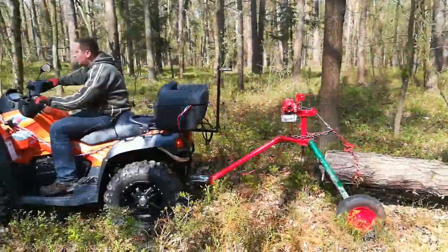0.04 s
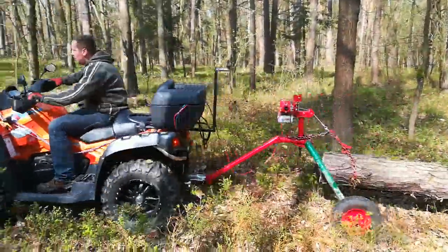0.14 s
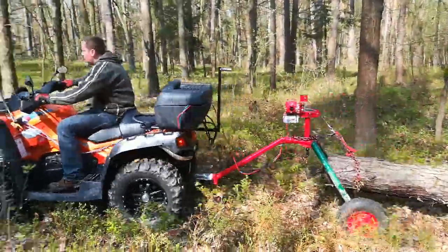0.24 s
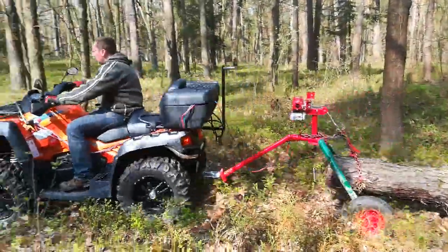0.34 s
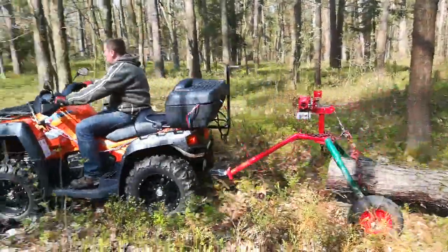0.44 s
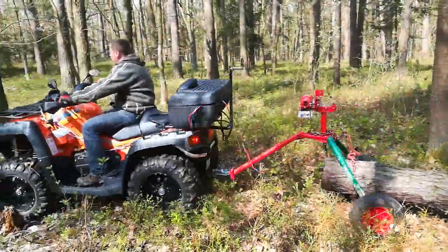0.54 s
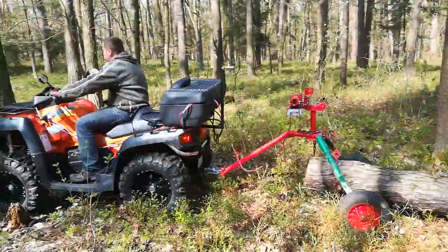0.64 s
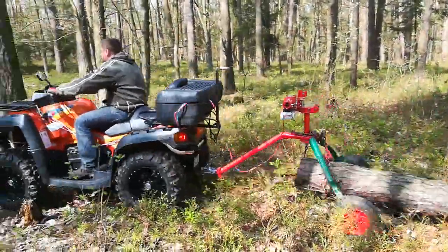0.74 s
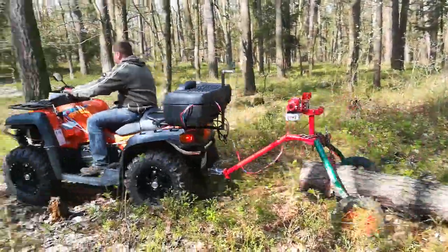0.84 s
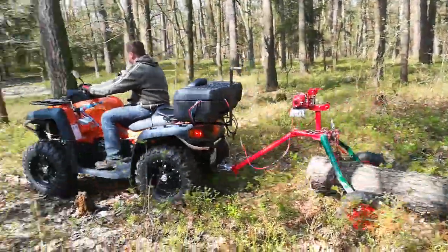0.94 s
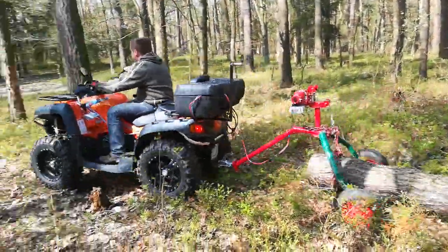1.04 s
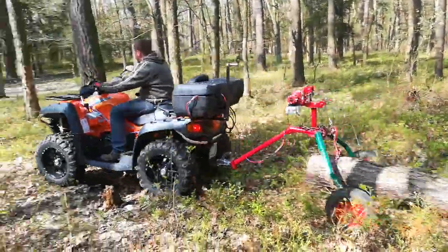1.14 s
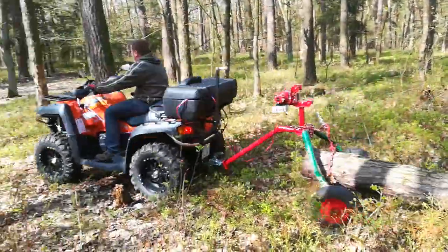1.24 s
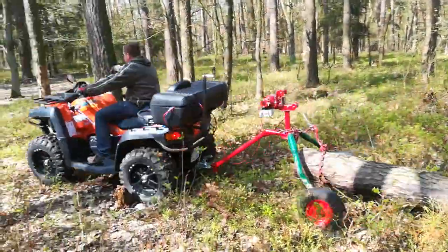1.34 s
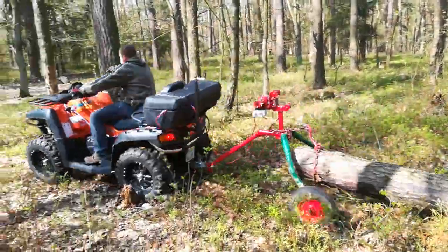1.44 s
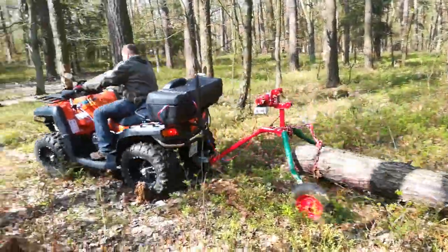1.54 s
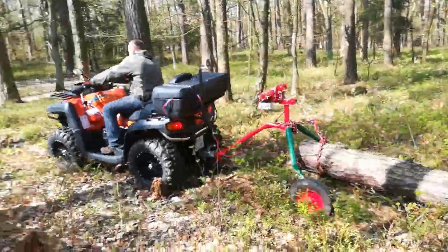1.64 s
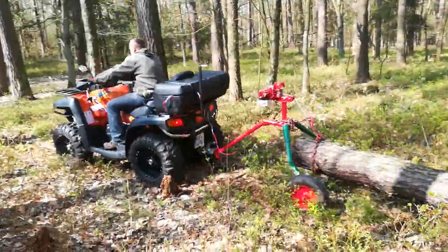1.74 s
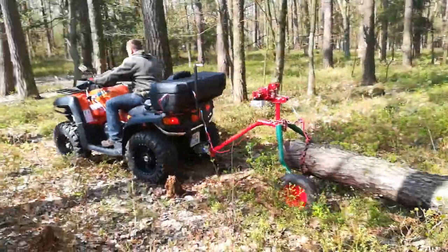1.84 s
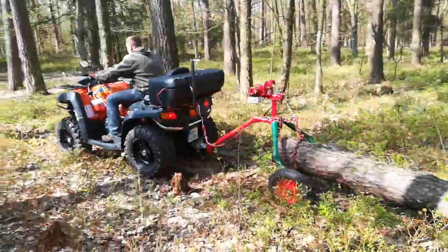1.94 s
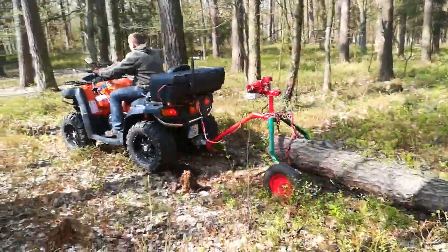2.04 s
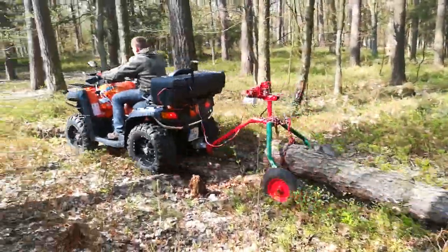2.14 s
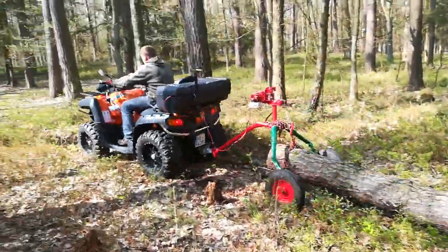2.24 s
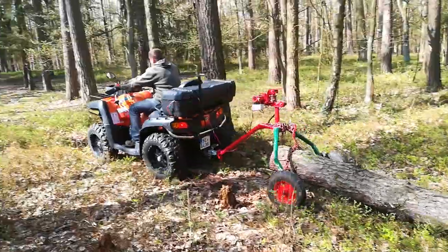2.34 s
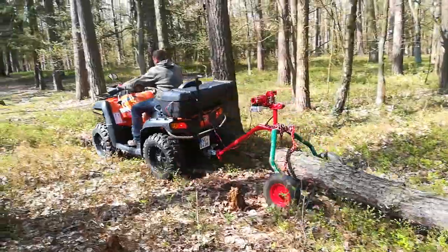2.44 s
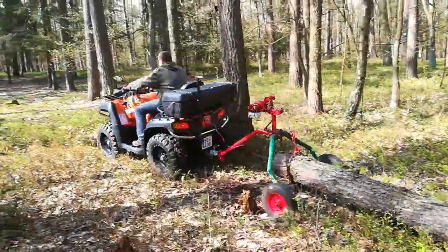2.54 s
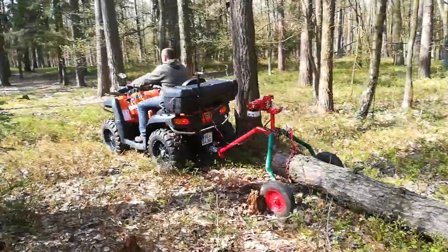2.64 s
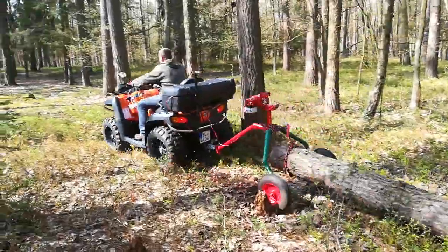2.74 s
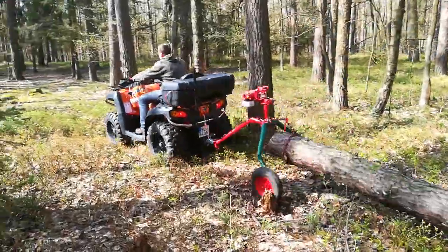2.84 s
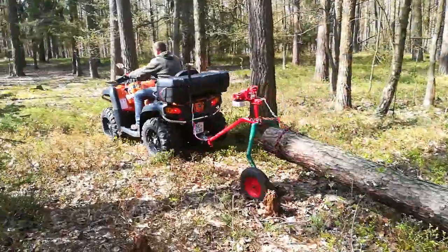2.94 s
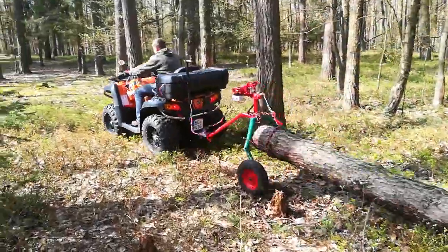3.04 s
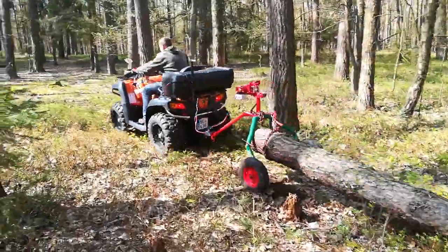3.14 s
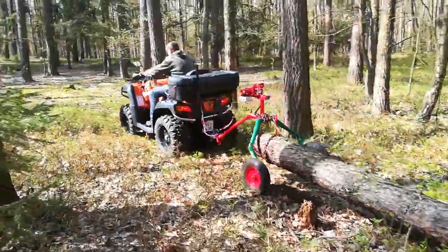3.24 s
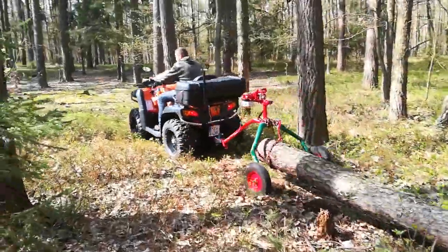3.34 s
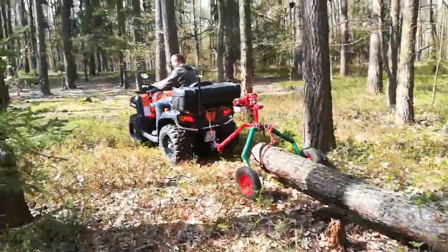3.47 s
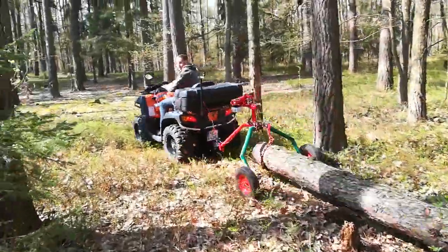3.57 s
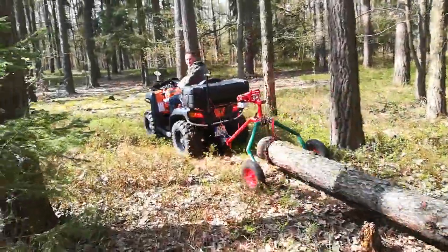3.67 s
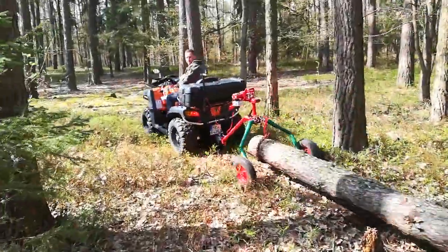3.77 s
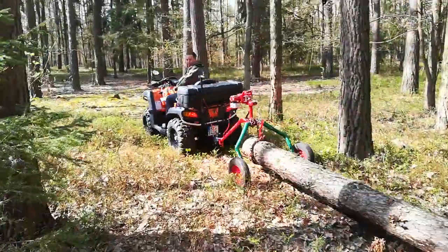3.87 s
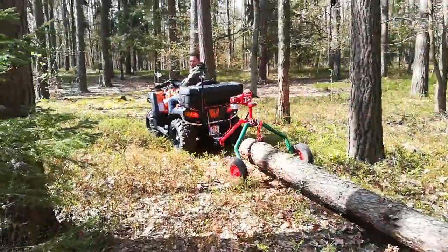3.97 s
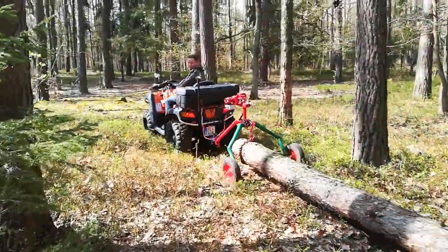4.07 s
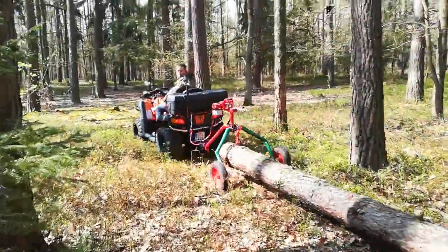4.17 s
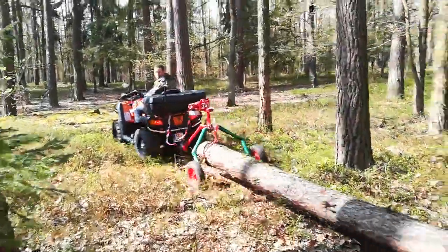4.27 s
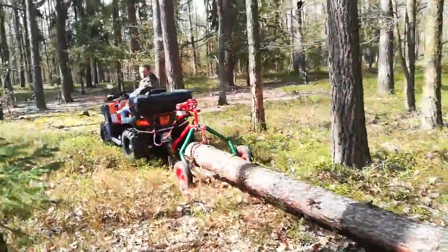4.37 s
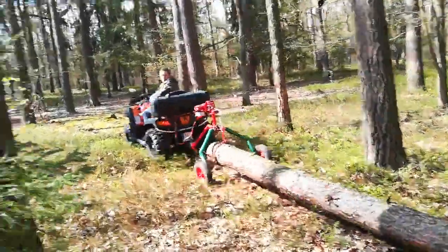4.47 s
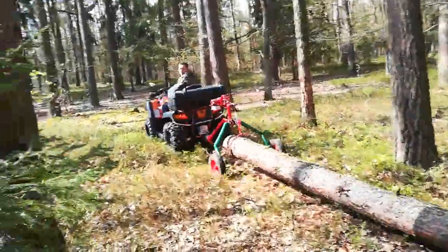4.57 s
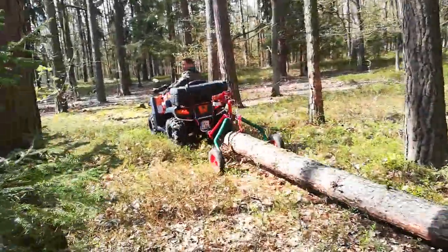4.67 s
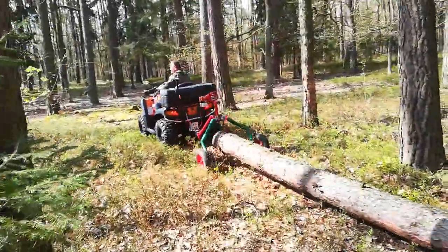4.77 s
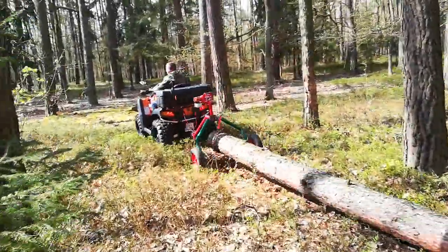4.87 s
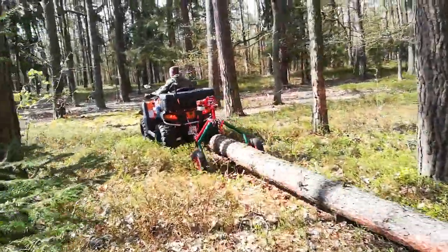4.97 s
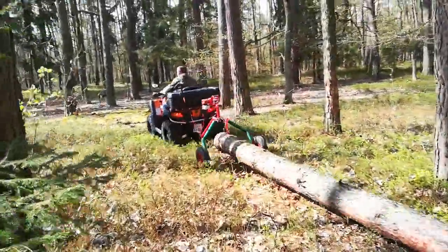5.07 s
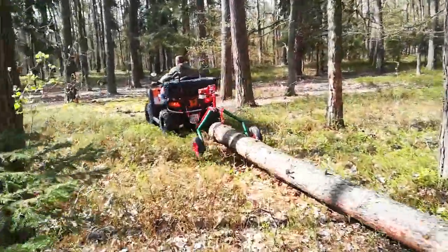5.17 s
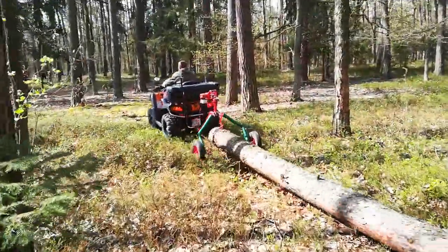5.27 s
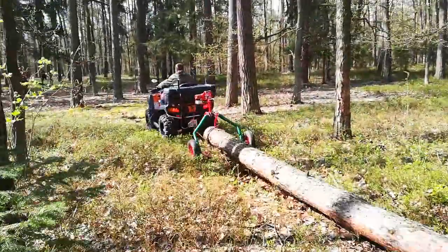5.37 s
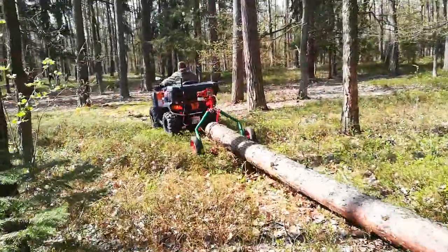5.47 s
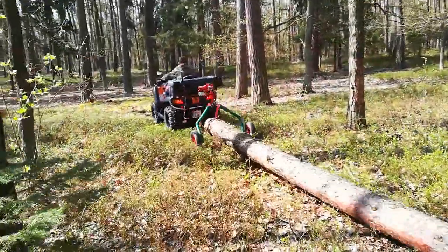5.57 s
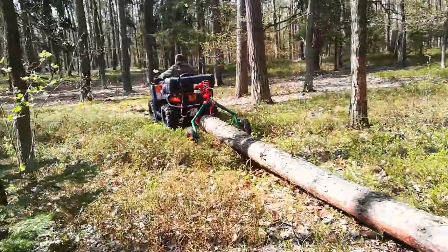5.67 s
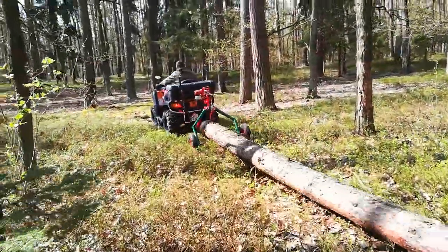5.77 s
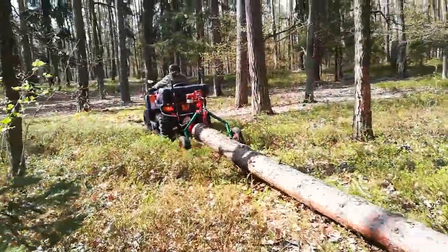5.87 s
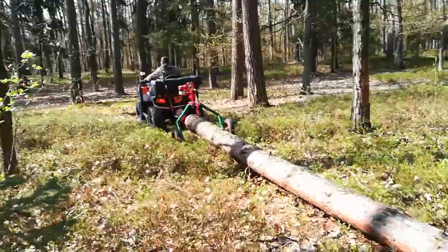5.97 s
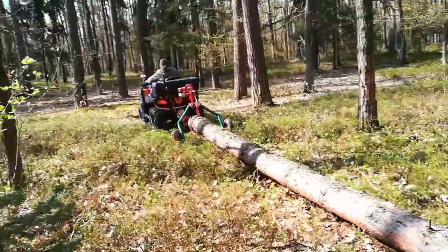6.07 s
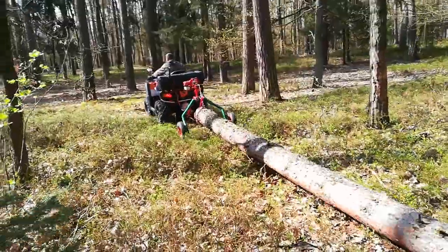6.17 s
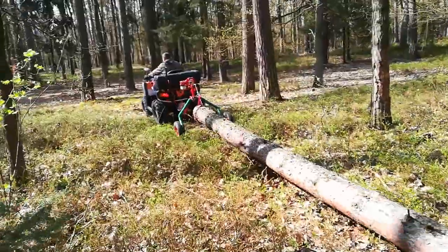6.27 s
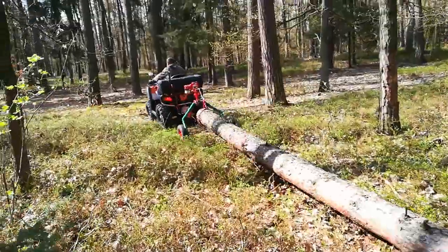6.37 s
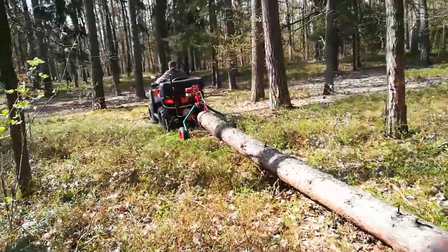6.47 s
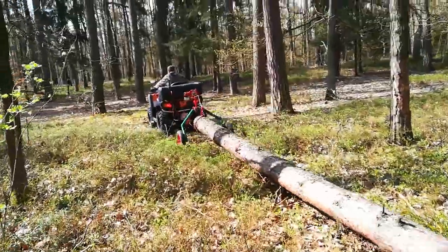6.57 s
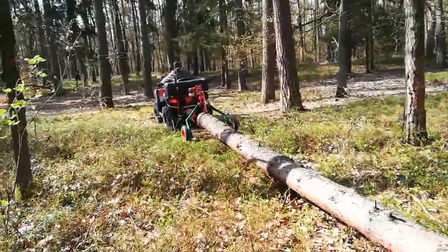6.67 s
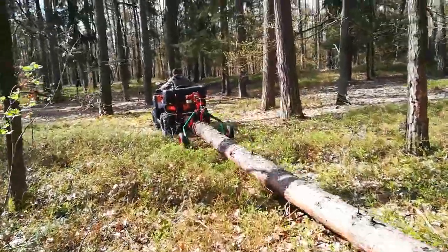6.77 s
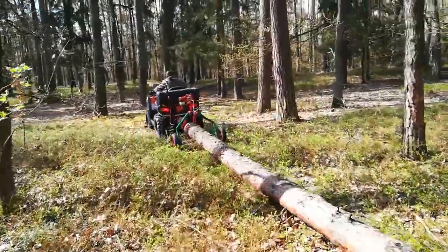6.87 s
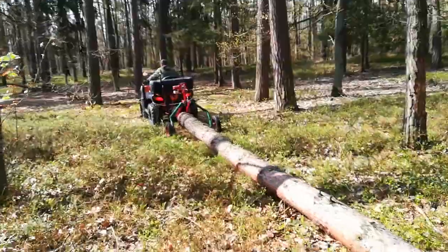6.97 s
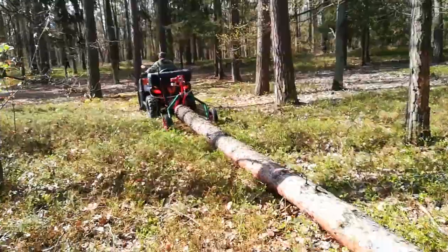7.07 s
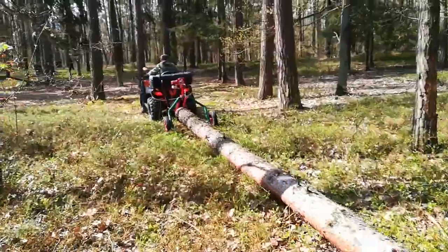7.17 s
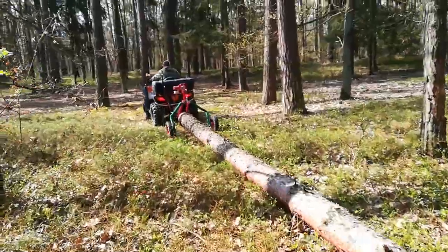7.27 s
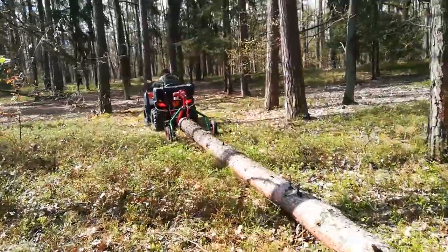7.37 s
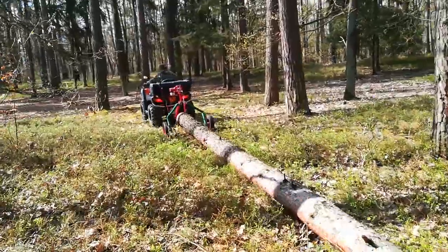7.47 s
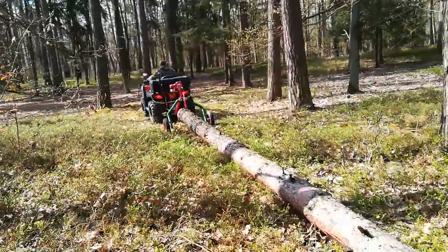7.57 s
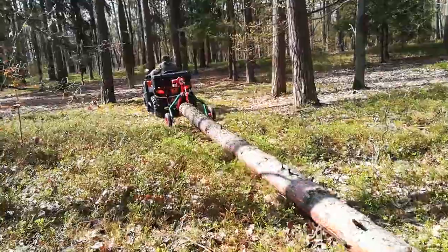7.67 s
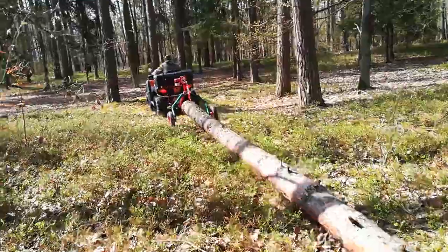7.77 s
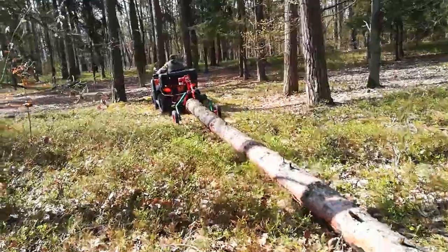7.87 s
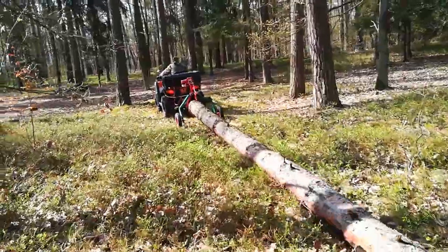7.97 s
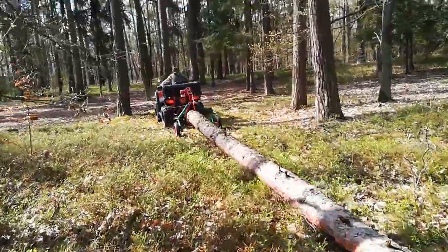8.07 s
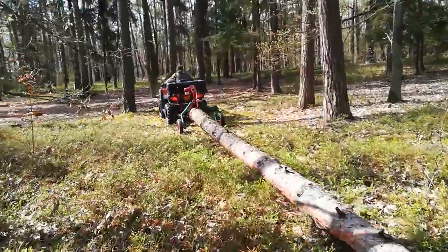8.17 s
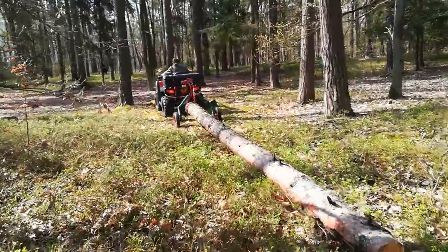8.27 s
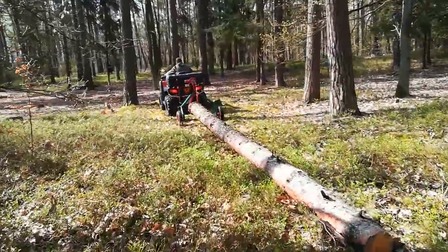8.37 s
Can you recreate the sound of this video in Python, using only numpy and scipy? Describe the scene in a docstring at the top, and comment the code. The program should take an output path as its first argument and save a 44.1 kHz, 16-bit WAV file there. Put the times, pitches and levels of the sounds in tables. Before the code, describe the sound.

A quad bike towing a log starts close to the microphone, its low exhaust thumping with a brief hollow bodywork boom and raspy clatter. Dry leaves and needles crackle, twigs snap sharply. The engine dips, revs up, then settles as it draws away, with thin gear whine coming and going. Outdoors in woodland, with faint echoes from trunks; stereo, engine central, litter wide.

```python
"""Thumping exhaust and a short bodywork boom come first, with litter crackling and twigs snapping:
a twin-cylinder quad bike tows a log through a pine forest and draws away from a two-port microphone.
Exhaust: twelve sine orders locked to engine speed; casing, rasp and boom: noise and clicks in bands.
Gears: gliding sines. Tyres and log: dull noise, grainy litter hiss, snap and crunch bursts."""
import sys
import numpy as np
from scipy import signal
from scipy.fft import rfft, irfft
from scipy.io import wavfile
from scipy.ndimage import uniform_filter1d

SR = 44100
rng = np.random.default_rng(int(sys.argv[2]) if len(sys.argv) > 2 else 0)


def log_audio(samples):
    """Write samples as a 16-bit WAV file to the path given in sys.argv[1]."""
    # one column per channel
    frames = np.atleast_2d(samples).T
    # limit to full scale, then quantise
    limited = np.clip(frames, -1, 1)
    pcm = np.round(limited * 32767).astype(np.int16)
    wavfile.write(sys.argv[1], SR, pcm)


N = 370881


def from_db(db):
    """Gain of a dB value."""
    return 10 ** (np.asarray(db) / 20)


def rms_one(x):
    """Scaled to rms 1."""
    return x / np.sqrt(np.mean(x ** 2) + 1e-20)


def evened(x):
    """Level held near rms 1 by two 0.2 s averages of power in a row."""
    power = uniform_filter1d(uniform_filter1d(x ** 2, SR // 5), SR // 5)
    return x / np.sqrt(power + 1e-12)


def in_time(rows):
    """Columns of a curve table, sample by sample."""
    time_s, *columns = np.transpose(rows)
    return [np.interp(np.arange(N) / SR, time_s, column) for column in columns]


def at_hz(points, hz):
    """A spectrum read on a log-frequency axis."""
    point_hz, value = np.array(points).T
    return np.interp(np.log(hz + 1), np.log(point_hz), value)


def colour(x, spectrum):
    """Causal (minimum-phase) filter with the given dB spectrum."""
    size = 16384
    gain = from_db(at_hz(spectrum, np.fft.rfftfreq(size, 1 / SR)))
    cepstrum = irfft(np.log(gain))
    cepstrum[1:size // 2] *= 2
    cepstrum[size // 2 + 1:] = 0
    response = irfft(np.exp(rfft(cepstrum)))
    return signal.fftconvolve(x, np.atleast_2d(response), axes=-1)[:, :N]


def band(x, low_hz, high_hz):
    """Second-order Butterworth band-pass."""
    return signal.sosfilt(signal.butter(2, [low_hz, high_hz], "band", fs=SR, output="sos"), x)


def burst(envelope, hz, octaves):
    """Stereo noise under an envelope, then limited to hz plus or minus octaves."""
    low_hz, high_hz = np.clip([hz / 2 ** octaves, hz * 2 ** octaves], 100, .45 * SR)
    return band(envelope * rng.standard_normal((2, len(envelope))), low_hz, high_hz)


def drift(rate_hz):
    """Slow random curve of rms 1, computed every 40 samples."""
    r = np.exp(-80 * np.pi * rate_hz / SR)
    slow = signal.lfilter([1], [1, -2 * r, r * r], rng.standard_normal(N // 40 + 2002))[2000:]
    return np.interp(np.arange(N) / 40, np.arange(len(slow)), rms_one(slow))


# stereo likeness of wide noise: hz, left_right_correlation
LIKENESS = [(300, 0.077), (640, 0.19), (1400, 0.69), (3100, 0.068), (15000, 0.039)]
# stereo balance of wide noise: hz, left_minus_right_db
BALANCE = [(300, -5), (700, 15.5), (1400, -6), (2800, 1), (5600, 3), (12000, 1.1)]


def spread(white, low_hz, count, patchy_db):
    """Four white signals become stereo, in half-octave bands with own likeness, balance and flicker."""
    out, edges_hz = 0, low_hz * 2 ** (np.arange(count + 1) / 2)
    for k, (low, high) in enumerate(zip(edges_hz, edges_hz[1:])):
        mid, side = band(white[k % 2], low, high)
        hz = np.sqrt(low * high)
        alike = np.clip(at_hz(LIKENESS, hz), -1, 1)
        balance_db = at_hz(BALANCE, hz) * np.array([[.5], [-.5]])
        gain = from_db(patchy_db * drift(24) + balance_db)
        out = out + gain * (np.sqrt(1 + alike) * mid + np.sqrt(1 - alike) * side * [[1], [-1]])
    return out


NEAREST_M, NEAREST_S, GROUND_M_PER_S = 3.74, 0.032, 1.197
TURN_FROM_S, TURN_TO_S = 1.64, 4.04


def passing():
    """Straight path: loss in dB by inverse distance, and the turn from 0 side-on to 1 from behind."""
    t = np.arange(N) / SR
    metres = np.hypot(NEAREST_M, GROUND_M_PER_S * (t - NEAREST_S))
    turn = np.clip((t - TURN_FROM_S) / (TURN_TO_S - TURN_FROM_S), 0, 1)
    return 20 * np.log10(NEAREST_M / metres), np.sin(turn * np.pi / 2)


# returns from trunks and ground, per port: delay_s, level_db
ECHOES_LEFT = [(.021, -60), (.047, -20)]
ECHOES_RIGHT = [(.030, -24), (.061, -24)]


def forest(x):
    """Direct sound plus trunk and ground echoes: delayed copies, different at each port."""
    ports = []
    for echoes in (ECHOES_LEFT, ECHOES_RIGHT):
        port = x
        for delay_s, db in echoes:
            port = port + from_db(db) * np.r_[np.zeros(round(delay_s * SR)), x][:N]
        ports.append(port)
    return np.stack(ports)


RUMBLE_DB, RUMBLE_TOP_HZ = -43, 143   # level before distance loss
RUMBLE_FOLLOWS = 0.38   # share of the engine's dB loss with distance


def rumble(loss_db):
    """Tyres and log on the ground: low-passed noise, partly its own in each port."""
    white = rng.standard_normal((2, N)) * 0.9 + rng.standard_normal(N)
    dull = signal.sosfilt(signal.butter(2, RUMBLE_TOP_HZ, fs=SR, output="sos"), white)
    return from_db(RUMBLE_DB + RUMBLE_FOLLOWS * loss_db) * rms_one(dull)


# dry litter under wheels and log: time_s, level_db
RUSTLE = [(0.0, -36.5), (0.84, -37), (1.87, -38.5), (2.25, -36.5), (2.69, -39), (2.97, -39.5), (3.35, -36),
          (4.54, -43), (5.04, -41.5), (5.43, -47), (6.09, -45), (6.7, -47.5), (7.0, -41), (7.61, -42.5),
          (8.06, -40.5), (8.41, -44)]
# litter colour: hz, relative_db
LITTER = [(1180, -20), (2000, -6), (2560, -7.5), (3460, -6), (4210, -3), (4960, -1.5), (6930, 0),
          (9270, -5), (10300, -10.5), (11400, -9), (12500, -12.5), (14900, -13.5), (15500, -4),
          (15900, -48)]
GRAINS_PER_S, GRAIN_SPREAD_DB, GRAIN_DB = 1500, 4.5, -8.5   # GRAIN_DB: relative to the hiss


def rustle():
    """Leaves and needles: dense random clicks of uneven size on a bed of hiss."""
    sizes = from_db(GRAIN_SPREAD_DB * np.minimum(rng.exponential(1, (2, 2, N)), 5))
    struck = rng.random(N) < GRAINS_PER_S * from_db(3 * drift(12)) / SR
    grains = sizes * rng.standard_normal((2, 2, N)) * struck
    white = rng.standard_normal((2, 2, N)) + from_db(GRAIN_DB) * rms_one(grains)
    bed = spread(white, low_hz=1420, count=7, patchy_db=1.5)
    return from_db(in_time(RUSTLE)[0]) * rms_one(colour(bed, LITTER))


PORT_LAG = 4   # samples by which record() delays the right port


# twig snaps: start_s, crack_peak_db, pitch_hz, left_minus_right_db, wide_noise_db, tail_db
# (wide noise relative to the crack's tone, tail relative to the crack)
SNAPS = [(0.3425, -21, 6130, 6, 2, -12), (0.5215, -19, 4530, 8, 1, -15), (1.2193, -36, 6650, 3, -12, -14),
         (1.267, -25.5, 6900, 6, -16, -14), (1.385, -23.5, 6450, 2, -12, -5),
         (1.502, -29, 5900, 3, -12, -14), (1.765, -30, 6300, 3, -12, -14), (1.798, -31, 6350, 3, -12, -14),
         (2.646, -30, 7100, 7, -14, -12), (2.9858, -25.5, 4900, 5, -12, -4), (3.4020, -18, 6500, 9, 5, -10),
         (4.3258, -28, 6830, 2.5, -12, -8), (4.692, -25.5, 6300, 6, -17, -14),
         (4.8364, -32, 3880, 3, -10, -14), (4.868, -28, 4000, 3, -14, -16), (4.873, -25, 4950, 5, 4, -7),
         (4.8845, -32, 4730, 3, -12, -14), (4.987, -30, 3500, 3, -4, -16), (5.142, -21, 6300, -8, -6, -16),
         (5.1688, -26, 6680, 1, -1, -16), (5.384, -25, 6760, 0, -1, -10), (5.7346, -26, 2550, -2, 3, -12),
         (5.7918, -36, 3590, 1, -12, -14), (6.2858, -34, 2700, -3, -12, -14),
         (6.4832, -20.5, 6400, 7, -6, -7.5), (6.745, -35, 7110, 5, -12, -14),
         (6.889, -29, 5660, 6, -14, -8), (7.1335, -33, 7400, 3, -8, -12), (8.084, -29, 6260, 4, -12, -14),
         (8.2842, -18.5, 5900, 4, -1, -22)]


def snap(db, hz, pan_db, wide_db, tail_db):
    """Breaking wood: a fast-decaying tone and wide noise, then a grainy splinter tail from 2 ms."""
    t = np.arange(2000) / SR
    tone = rms_one(t * np.exp(-t / .0003) * np.sin(2 * np.pi * hz * t))
    wide = rms_one(burst(np.exp(-t / .0004), 5000, octaves=1.4)[0])
    crack = tone + from_db(wide_db) * wide
    splinters = from_db(3 * rng.standard_normal(50)).repeat(40) * (t > .002)
    tail = burst(from_db(tail_db) * splinters * np.exp(-t / .0055), hz, octaves=1)
    both = crack / np.abs(crack).max() + tail
    return from_db(db) * both * from_db([[pan_db / 2], [-pan_db / 2]])


# short crunches of bark or brush: start_s, length_s, centre_hz, level_db, half_width_octaves
CRUNCHES = [(2.143, 0.17, 7170, -39, 0.46), (2.663, .07, 12500, -46, .3), (2.982, 0.066, 4270, -43.5, 0.48),
            (3.0, 0.5, 12500, -52, .3), (4.834, 0.031, 4370, -38, 0.42), (4.875, 0.026, 5170, -37.5, .5),
            (4.895, 0.05, 4300, -48, 0.07), (4.84, 0.089, 12500, -54, .3), (4.975, 0.014, 7100, -42, .1),
            (8.077, 0.07, 6300, -45, 0.51)]


def crunch(length_s, hz, db, octaves):
    """Crushed bark or brush: a rough noise burst with five narrow splinter rings inside its band."""
    size = round(length_s * SR)
    grain = from_db(3 * rng.standard_normal(size // 60 + 1)).repeat(60)[:size]
    envelope = grain * np.interp(np.arange(size), [0, .2 * size, size], [0, 1, .2])
    steps = rng.uniform(-1, 1, 5)
    rings = sum(burst(envelope, hz * 2 ** (octaves * step), octaves=.03) for step in steps)
    rough = rms_one(burst(envelope, hz, octaves))
    return from_db(db) * rms_one(rough + 0.39 * rms_one(rings))


def twigs():
    """Snaps and crunches placed in time; broadside, so they reach both ports together."""
    out = np.zeros((2, N + SR))
    hits = [(start_s, snap(*row)) for start_s, *row in SNAPS]
    hits += [(start_s, crunch(*row)) for start_s, *row in CRUNCHES]
    for start_s, hit in hits:
        at = round(start_s * SR)
        out[:, at:at + hit.shape[1]] += hit
    return np.stack([out[0, :N], out[1, PORT_LAG:N + PORT_LAG]])   # cancels the lag in record()


# gear whines: start_s, end_s, start_hz, middle_hz, end_hz, level_db (pitch and level before waver)
WHINES = [(.1, .5, 2455, 2400, 2345, -57), (.86, 1.0, 2365, 2390, 2420, -60), (0, .22, 980, 975, 965, -54),
          (.05, .95, 1600, 1550, 1515, -58), (.52, .75, 1240, 1215, 1170, -52),
          (1.52, 1.95, 1225, 1150, 1100, -49), (1.6, 1.92, 930, 900, 870, -51),
          (2.1, 2.35, 1480, 1510, 1545, -60), (2.2, 2.6, 1245, 1305, 1345, -55),
          (2.68, 3.2, 1345, 1350, 1345, -58), (3.4, 3.62, 1370, 1400, 1440, -57),
          (3.62, 4.1, 1195, 1210, 1228, -53.5), (4.19, 4.8, 1285, 1302, 1308, -50),
          (4.8, 5.17, 1308, 1280, 1258, -53), (4.8, 5.15, 1270, 1230, 1190, -59),
          (5.3, 5.7, 1390, 1375, 1355, -59), (5.65, 6.1, 1405, 1420, 1418, -59),
          (6.55, 7.2, 1510, 1530, 1545, -62), (7.45, 8.1, 1245, 1235, 1250, -61)]


def whine():
    """Gears: sine tones that glide and waver in pitch and level, with 16 ms fades."""
    out, t = np.zeros(N), np.arange(N) / SR
    waver_db = 1.3 * drift(60) + 1.8 * drift(5)
    waver_hz = 3 * drift(30) + 2.5 * drift(4)
    for start_s, end_s, *glide_hz, db in WHINES:
        on = slice(round(start_s * SR), round(end_s * SR))
        fade = np.clip(np.minimum(t[on] - start_s, end_s - t[on]) / 0.016, 0, 1)
        hz = np.interp(t[on], [start_s, (start_s + end_s) / 2, end_s], glide_hz) + waver_hz[on]
        tone = np.sqrt(2) * np.sin(2 * np.pi * np.cumsum(hz) / SR)
        out[on] += fade * from_db(db + waver_db[on]) * tone
    return out


# body resonances: centre_hz, width_hz, side_db, rear_db, db_per_cycle_per_s
BODY = [(566, 24, -70, -65.5, 2.4), (620, 60, -64, -53, -1.5), (705, 30, -70, -65, 1.5),
        (790, 40, -70, -63, -1.5), (870, 50, -60, -66, .5), (920, 300, -51, -72, 0),
        (780, 400, -59, -58, .5), (485, 70, -72, -67, 2.2), (1120, 160, -58, -61, 0)]


def singing(once, away, faster):
    """Body resonances rung by one click a cycle: engine orders inside them sing, coming and going."""
    out = 0
    for hz, width_hz, side_db, rear_db, db_per_cycle_per_s in BODY:
        r = np.exp(-np.pi * width_hz / SR)
        peak = [(1 - r * r) / 2, 0, (r * r - 1) / 2, 1, -2 * r * np.cos(2 * np.pi * hz / SR), r * r]
        db = side_db + (rear_db - side_db) * away + db_per_cycle_per_s * faster + 2.2 * drift(4)
        out = out + from_db(db) * rms_one(signal.sosfilt([peak, peak], once))
    return out


FIRING_SPREAD_DB, FIRING_JITTER_S = 0.5, .00006


def firings(cycle):
    """Two firings a cycle: clicks uneven in strength and time; also a copy with alternating sign."""
    at = np.flatnonzero(np.diff(np.floor(2 * cycle)))
    chance = rng.standard_normal((len(at), 2))
    at = np.clip(at + np.round(FIRING_JITTER_S * SR * chance[:, 0]).astype(int), 0, N - 1)
    both, unlike = np.zeros((2, 1, N))
    both[0, at] = from_db(FIRING_SPREAD_DB * chance[:, 1])
    unlike[0, at] = both[0, at] * (-1) ** np.round(2 * cycle[at])
    return both, unlike


# clatter colour from the side and from behind: hz, relative_db
CLATTER_SIDE = [(220, 7), (380, 0), (449, -8), (599, 0), (657, -4.5), (927, 2.5), (1190, 2.5), (1360, 0),
                (1560, 3), (1730, -2), (2410, -4.5), (2750, -11), (3500, 1), (4550, -35), (7700, -120)]
CLATTER_REAR = [(220, -12), (380, -5.5), (453, -12), (521, -6.5), (567, 1.5), (664, -5), (814, -3.5),
                (953, -7), (1260, 5.5), (1430, 2.5), (1620, -2), (1830, 4), (1990, -6), (2440, -9.5),
                (3500, -0.5), (4550, -22), (7700, -120)]
# knock relative to the casing noise: time_s, relative_db
KNOCK = [(0, -5), (1.6, -5), (1.9, -3), (2.4, -3), (4.8, -4), (5.3, -8), (8.41, -8)]
CLATTER_DB, GATE_DEPTH = -39.5, 0.022   # level before distance loss
KNOCK_TOP_HZ, KNOCK_RING_S, KNOCK_SPREAD_DB = 1050, .006, 1.2


def clatter(cycle, both, unlike, away, loss_db):
    """Casing noise swelling slightly twice a cycle, plus a decaying knock ring for each cylinder."""
    gate = 1 + GATE_DEPTH * np.cos(2 * np.pi * 2 * cycle - 1.5)
    white = rng.standard_normal((2, 2, N))
    noise = rms_one(spread(white, low_hz=279.2, count=8, patchy_db=2)) * gate
    rings = rng.standard_normal((2, 1, 2000)) * np.exp(-np.arange(2000) / SR / KNOCK_RING_S)
    uneven = from_db(KNOCK_SPREAD_DB * rng.standard_normal(N))
    knock = 0
    for sign, ring in zip((1, -1), rings):
        knock = knock + signal.fftconvolve(uneven * (both + sign * unlike), ring)[:, :N]
    knock = band(knock, 400, KNOCK_TOP_HZ)
    source = noise + from_db(in_time(KNOCK)[0]) * rms_one(knock)
    side, rear = rms_one(colour(source, CLATTER_SIDE)), rms_one(colour(source, CLATTER_REAR))
    return from_db(CLATTER_DB + loss_db) * ((1 - away) * side + away * rear)


GROWL_HZ, GROWL_OCTAVES, GROWL_DB, GROWL_REAR_LOSS_DB = 920, 0.36, -51, 4
GROWL_LAG_CYCLES, GROWL_SHARPNESS, GROWL_SPREAD_DB = .06, 1.7, 1.5


def growl(cycle, away):
    """Rasp: band noise that swells once a cycle, each swell with a strength of its own."""
    turn = cycle - GROWL_LAG_CYCLES
    strength = from_db(GROWL_SPREAD_DB * rng.standard_normal(400))[np.round(turn).astype(int)]
    swell = strength * np.exp(GROWL_SHARPNESS * np.cos(2 * np.pi * turn))
    rasp = burst(swell, GROWL_HZ, GROWL_OCTAVES)[0]
    return from_db(GROWL_DB - GROWL_REAR_LOSS_DB * away) * rms_one(rasp)


# bodywork boom colour: hz, relative_db
BOOM_COLOUR = [(150, -57), (290, -13.5), (322, 16), (350, 5.5), (390, -38), (700, -61)]
BOOM_DB, BOOM_UNTIL_S, BOOM_FADE_DB_PER_S = -38, 0.33, 43


def boom(once):
    """Bodywork heard while the flank is close: one click a cycle through a resonance, then a fade."""
    fading_db = BOOM_FADE_DB_PER_S * np.maximum(np.arange(N) / SR - BOOM_UNTIL_S, 0)
    return from_db(BOOM_DB - fading_db) * rms_one(colour(once, BOOM_COLOUR))[0]


# exhaust colour shared by both cylinders (even orders), from the side and behind: hz, relative_db
PIPE_SIDE = [(25, 4), (57, 2), (85, -1), (112, 9), (125, -1), (140, -2), (172, -1), (220, 2.5), (245, -3.5),
             (285, -10), (340, -22), (420, -46), (700, -36.5)]
PIPE_REAR = [(25, -30), (64, 3.5), (95, 0.5), (128, 7), (145, 2.5), (190, 4.5), (212, 5), (245, -2),
             (285, -15), (320, -15), (420, -49), (700, -71)]
# exhaust colour of what differs between cylinders (odd orders): hz, relative_db
PIPE_MISMATCH = [(15, -36), (27, -17), (31, -14.5), (36, -7), (60, -23), (88, -18), (98, -16), (106, -0.5),
                 (145, -18), (176, -4.5), (205, -1), (250, -11), (300, -12.5), (420, -57), (700, -40.5)]
# even orders above UPPER_FROM_HZ: time_s, relative_db
UPPER = [(0, -7), (.5, -3), (1.0, 0), (1.4, 2), (1.8, 3.5), (2.15, 4.5), (2.45, 3), (2.8, 1), (3.3, -2.5),
         (3.7, 2.5), (4.5, 0), (5.2, 0), (6, 1.5), (7, 0.5), (8.41, 2.5)]
UPPER_FROM_HZ, SILENCER_HZ = 150, 343   # the silencer passes little above its corner
PIPE_TURN_POWER = 3   # the colour turns later than the level falls
ORDER_WAVER_DB, MISMATCH_WAVER_DB = 0.6, 1.5
SURGE_ORDER, SURGE_DAMPING, PUSH_LAG_CYCLES = 3, .24, .43   # gas column resonance, sets order phases
HOLD_FROM_ORDER, HOLD_RAD_PER_CYCLE, HOLD_CYCLES_PER_S = 6, .85, 29.3


def exhaust(cycle, speed, level_db, mismatch_db, lower_db, away):
    """Twelve sine orders of the engine cycle through a pipe whose colour turns from side to rear."""
    pipe, turned, (upper_db,) = 0, away ** PIPE_TURN_POWER, in_time(UPPER)
    lower_db = lower_db + MISMATCH_WAVER_DB * drift(6)
    # from the side, upper orders come later as the speed drops
    hold = HOLD_RAD_PER_CYCLE * (HOLD_CYCLES_PER_S - speed) * (1 - away)
    for order in range(1, 13):
        hz, ratio = order * speed, order / SURGE_ORDER
        if order % 2:
            db = at_hz(PIPE_MISMATCH, hz) + mismatch_db * (order > 1) + lower_db * (order in (3, 5))
        else:
            db = (1 - turned) * at_hz(PIPE_SIDE, hz) + turned * at_hz(PIPE_REAR, hz)
            db = db + upper_db * (hz > UPPER_FROM_HZ)
        gain = from_db(db + ORDER_WAVER_DB * drift(9)) / np.sqrt(1 + (hz / SILENCER_HZ) ** 8)
        surge = np.arctan2(2 * SURGE_DAMPING * ratio, 1 - ratio ** 2)
        lag = surge + hold * (order >= HOLD_FROM_ORDER)
        sign = -1 if order in (1, 9) else 1   # these pull where the others push
        pipe = pipe + sign * gain * np.sin(2 * np.pi * order * (cycle - PUSH_LAG_CYCLES) - lag)
    return from_db(level_db) * evened(pipe)


# engine speed: time_s, cycles_per_s
SPEED = [(0.0, 29.54), (0.54, 27.82), (0.77, 27.5), (1.01, 28.95), (1.12, 28.68), (1.4, 30.25),
         (1.45, 30.44), (1.69, 28.2), (1.99, 26.46), (2.08, 26.65), (2.6, 31.72), (2.69, 32.72),
         (2.95, 32.52), (3.04, 32.72), (3.35, 32.22), (3.72, 34.93), (3.84, 35.14), (3.98, 35.14),
         (4.1, 35.35), (4.22, 35.84), (4.33, 35.92), (4.78, 34.64), (5.48, 31.26), (5.81, 30.37),
         (5.99, 30.65), (6.21, 31.01), (6.67, 30.25), (7.07, 31.12), (7.47, 32.63), (7.96, 32.79),
         (8.17, 31.63), (8.41, 31.28)]
# throttle: time_s, exhaust_db, mismatch_db (odd orders from 3), lower_mismatch_db (added to orders 3, 5)
THROTTLE = [(0, -3.5, -4, 0), (.3, -3, -8.5, 5), (.6, -3.5, 1, -1), (1.0, -3.5, 0.5, -11),
            (1.4, -4, 1.5, -3), (1.8, -1.5, 0, -6), (2.05, -0.5, -0.5, 8), (2.25, -2.5, 7.5, 5),
            (2.5, -2.5, -0.5, 2), (2.8, -2, 0, -3), (3.1, -2.5, 2, -3), (3.6, 0, 5, -6.5),
            (4.2, -1, 0.5, 1), (4.8, -1, -1, 1), (5.2, -1.5, 1.5, 6.5), (5.5, -1, 3, 5), (5.8, -0.5, 0, 1),
            (6.2, -1.5, 3, 1), (6.7, 0, -2, -7), (7.1, 0.5, 2, -2), (7.5, -1, 0.5, 10), (8.0, -2, 7, 0),
            (8.2, 0.5, 5, 2), (8.41, 0.5, 1, 0)]
MEAN_CYCLES_PER_S = 31
EXHAUST_DB, FLANK_GAIN_DB = -22, 5   # before distance loss and throttle; gain when side-on


def scene():
    """Engine tones nearly alike in both ports; clatter and litter wide."""
    (speed,), (throttle_db, mismatch_db, lower_db) = in_time(SPEED), in_time(THROTTLE)
    loss_db, away = passing()
    cycle = np.cumsum(speed) / SR + .415
    both, unlike = firings(cycle)
    once = both + unlike   # alternate firings cancel: one click a cycle
    level_db = EXHAUST_DB + loss_db + throttle_db + FLANK_GAIN_DB * (1 - away)
    body = growl(cycle, away) + singing(once[0], away, speed - MEAN_CYCLES_PER_S)
    centre = whine() + from_db(loss_db) * body + boom(once)
    centre += exhaust(cycle, speed, level_db, mismatch_db, lower_db, away)
    ground = rumble(loss_db) + rustle() + twigs()
    return ground + clatter(cycle, both, unlike, away, loss_db) + forest(centre)


# microphone port resonance: hz, relative_db
PORT_COLOUR = [(5500, 0), (6400, 0), (6900, 1), (7500, -0.5), (9000, -1.5)]
CUTOFF_HZ = 16500   # stop-band edge


def record(dry):
    """Right port lags; both peak slightly near 7 kHz; the deepest bass and the top are cut."""
    ports = np.stack([dry[0], np.r_[np.zeros(PORT_LAG), dry[1, :-PORT_LAG]]])
    ports = colour(ports, PORT_COLOUR)
    ports = signal.sosfilt(signal.butter(2, 15, "high", fs=SR, output="sos"), ports)
    return signal.sosfilt(signal.cheby2(12, 70, CUTOFF_HZ, fs=SR, output="sos"), ports)


dry = scene()
out = record(dry)
log_audio(out)
```